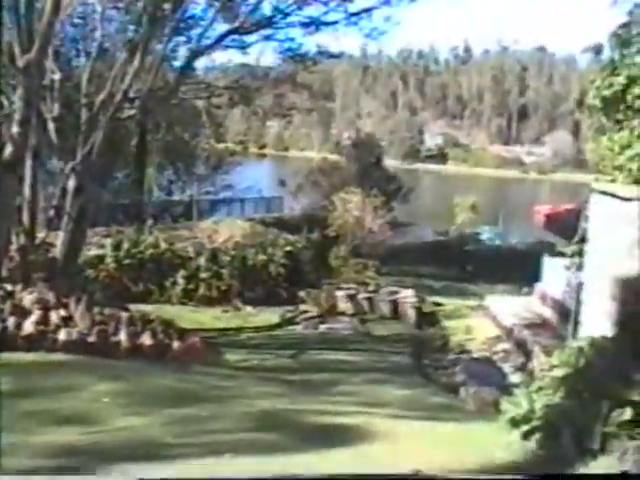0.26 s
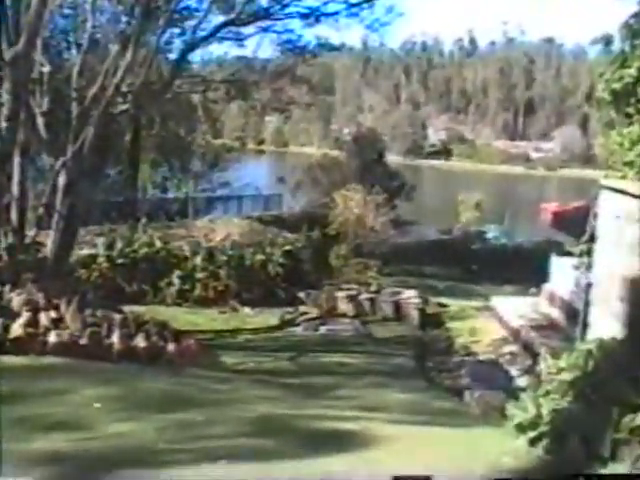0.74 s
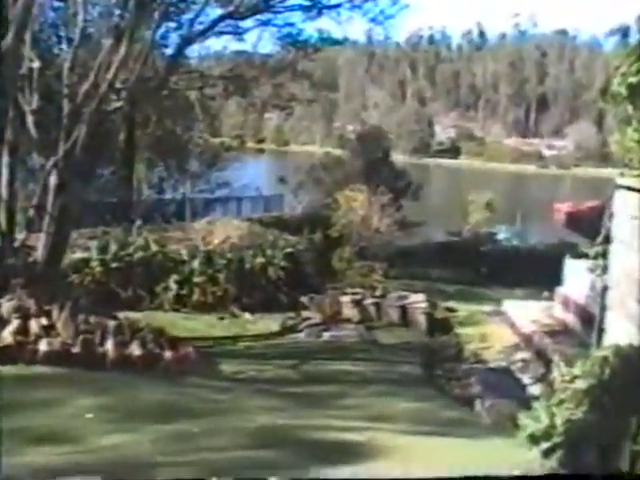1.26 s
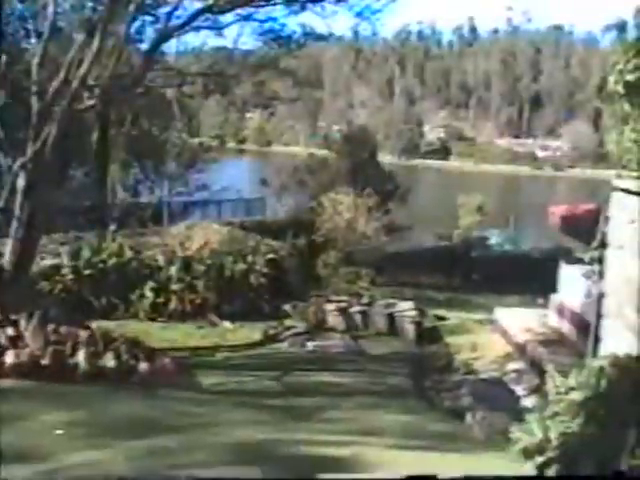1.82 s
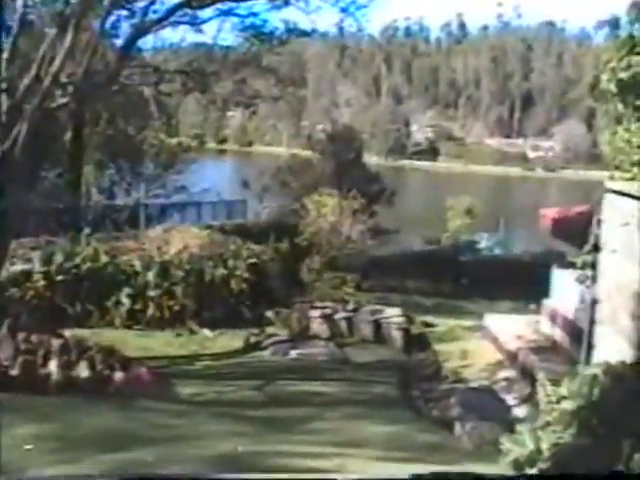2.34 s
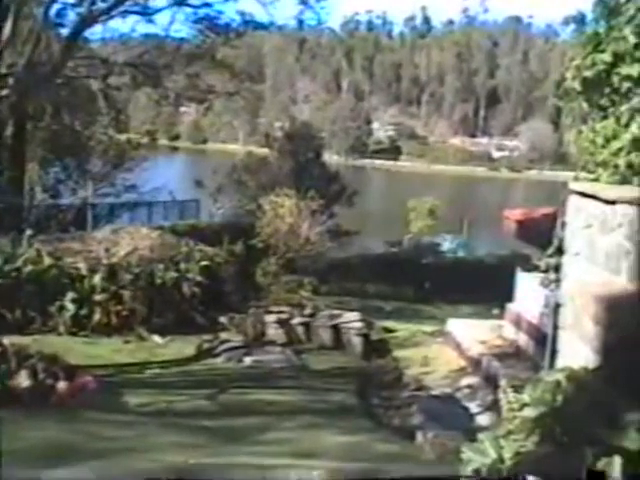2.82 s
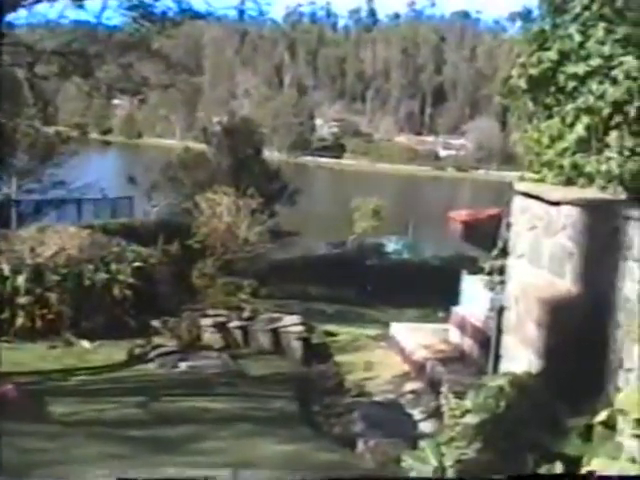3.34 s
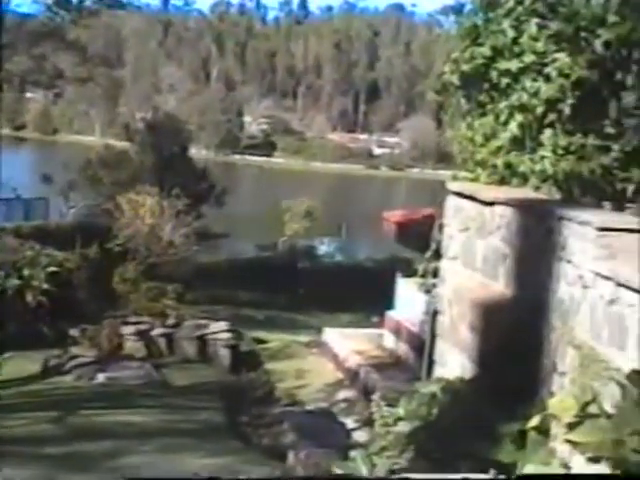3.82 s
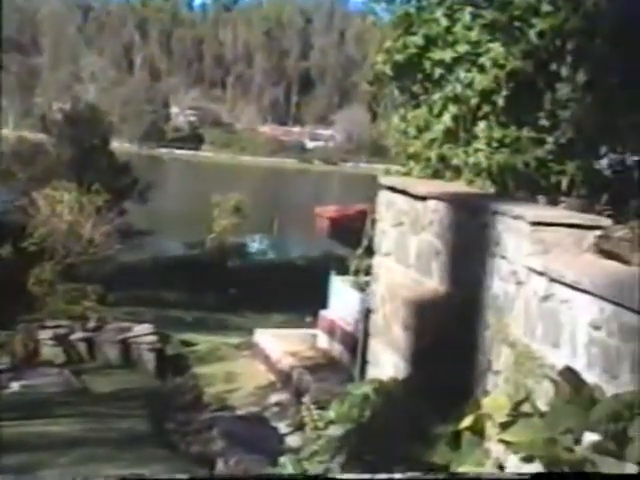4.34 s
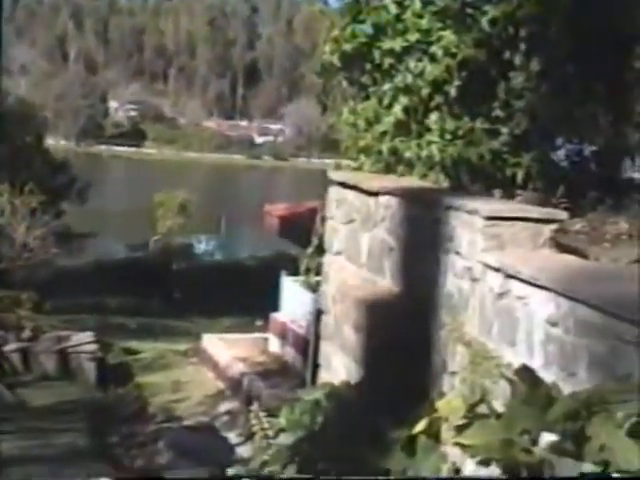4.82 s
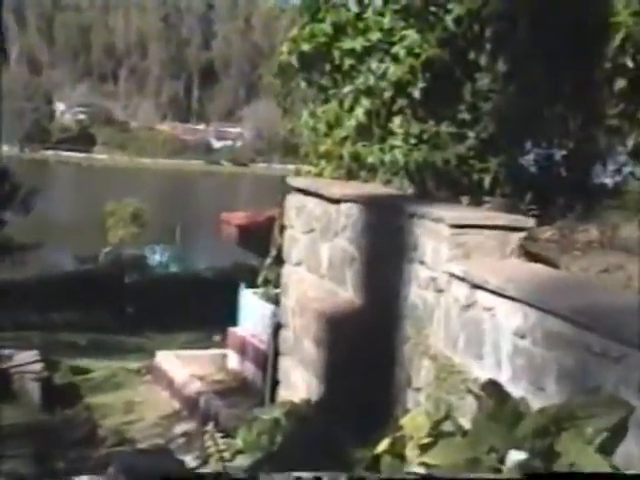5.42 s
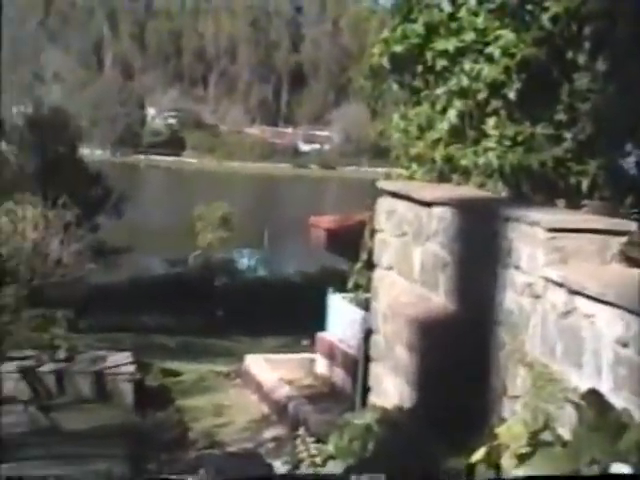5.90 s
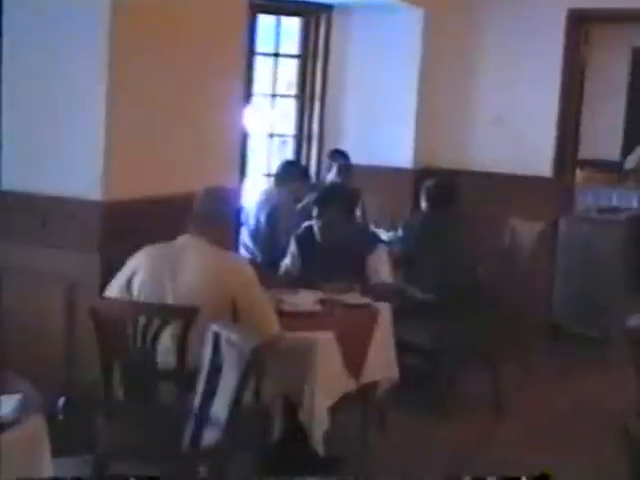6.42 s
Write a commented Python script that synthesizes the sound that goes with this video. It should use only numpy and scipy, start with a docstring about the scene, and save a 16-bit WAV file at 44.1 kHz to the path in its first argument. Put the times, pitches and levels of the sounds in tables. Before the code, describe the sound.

From 0 to 6.3 seconds, a low, throbbing motor hum from an old tape camera runs steadily, with barely audible thin whines and soft flickering hiss. Behind it lies dull, quiet garden air and a faint lumpy wind rumble. The sound begins leaning right, nears the centre around 2 seconds and leans clearly left by 4. Soft muffled knocks fall near 0.85 and 1.05, with a small rustling tick between them, a deeper bump at 2.1, and a very faint tap at 3.6. More knocks and a light rustle gather from 5.5 to 6.1. At about 6.32 a strong low thump drops in pitch; hum and garden cut out. A near-silent, murky gap with weaker thumps follows, then from 6.45 rough, muffled room noise comes in nearly centred, with brighter hiss, small knocks and a sharp tick at 6.56, sagging slightly to the end.

```python
"""A quiet garden, heard through an old tape camera, gives way to a room at a splice.
The camera's motor hums on multiples of its shaft speed, with thin steady whines, over shaped noise for
air, wind and tape hiss. Knocks are short ringing swings and rustles are puffs of noise.
The sound drifts from right to left. At the splice the tape thumps in low swings that fall in pitch,
the garden drops out, and after a near silent gap a room of roughened noise comes in."""
import sys
import numpy as np
from scipy import signal
from scipy.io import wavfile
from scipy.ndimage import uniform_filter1d

SR = 44100
rng = np.random.default_rng(int(sys.argv[2]) if len(sys.argv) > 2 else 0)


def bounce(signal):
    """Save signal as a 16-bit WAV file at the path given by the first command-line argument."""
    frames = np.transpose(np.atleast_2d(signal))
    limited = np.clip(frames, -1, 1)
    pcm = np.round(limited * 32767).astype(np.int16)
    wavfile.write(sys.argv[1], SR, pcm)


N = 293704  # length in samples

# Noise colours, each giving the relative strength of noise at a pitch: [f/Hz, level/dB per Hz]
# air of the garden
GARDEN_COLOUR = [(20, -22), (50, 1.5), (90, -0.5), (130, -2.5), (180, -1), (220, -1), (260, -3),
                 (330, -6.5), (400, -2), (480, -6), (700, -7), (1000, -14), (1400, -13), (1600, -20),
                 (1950, -21), (2250, -25.5), (2800, -34), (5000, -61)]
# rumble of the wind
WIND_COLOUR = [(10, -14), (25, 1.5), (50, 3), (70, -26), (100, -22), (200, -66)]
# air of the room after the splice
ROOM_COLOUR = [(40, 0), (120, 1), (300, 2), (500, -3.5), (800, -7), (1200, -18.5), (1700, -13), (2300, -25),
               (4000, -60)]
# dull murk of the blank tape
GAP_COLOUR = [(40, 0), (200, 2), (350, -14), (700, -21), (2000, -30), (4000, -50)]
# tape hiss
HISS_COLOUR = [(100, 5), (800, -1.5), (2000, -3), (4000, -2), (8000, -.5), (11500, 0)]
# faint noise that differs between the sides
SIDE_COLOUR = [(100, -9), (500, 1), (1200, 5), (2500, -6), (5000, -21), (11000, -11)]
# rustles and ticks
RUSTLE_COLOUR = [(100, 4), (300, 2.5), (1000, -7.5), (2200, -16), (3500, -38), (8000, -52)]

# rise and fall of the garden air: [t/s, level change/dB]
AIR_LEVEL = [(0, 0), (.7, -1), (1.3, -1.5), (2.1, -0.5), (2.9, -0.6), (3.4, 0.5), (3.7, 2), (4.1, -0.3),
             (4.9, -1), (5.3, -0.4), (5.8, 1.6), (6.3, 0)]
# balance of the two channels, the weaker one being turned down: [t/s, left minus right/dB]
DRIFT = [(0, -5), (.3, -4), (.65, -1.5), (1.45, -3), (1.72, -1.8), (1.85, -0.2), (2.5, 0.32), (3.3, 1.5),
         (4.1, 5), (6.3, 5.5)]
# brief broad rustles and ticks: [t/s, peak level/dB, time to peak/s]
RUSTLES = [(.958, -42, 0.0015), (5.803, -39.5, 0.0054), (5.93, -46, .002), (6.459, -43.5, 0.016),
           (6.482, -48, 0.012), (6.5607, -36, 0.00069), (6.59, -48, 0.0017), (6.648, -51, 0.0024)]
# soft knocks in the garden, at the splice and in the room: [t/s, level/dB, base pitch f/Hz]
KNOCKS = [(0.854, -38.5, 255), (0.959, -49, 295), (1.06, -36, 216), (2.085, -35, 58.5), (3.561, -50, 1475),
          (5.515, -42, 518), (5.757, -42.5, 1300), (5.785, -42.5, 796), (5.805, -39.5, 431),
          (6.027, -40, 450), (6.069, -30.5, 377), (6.077, -38, 425), (6.128, -41, 230), (6.308, -41, 422),
          (6.425, -45, 332), (6.459, -39, 434), (6.488, -47, 766), (6.6, -46, 703)]
# the three tones in each knock: [pitch as a multiple of the base pitch, level/dB]
KNOCK_TONES = [(1.012, -1), (0.804, -8), (1.6, -26)]
# thumps at the splice: [t/s, peak level/dB, sign of the first push, start f/Hz,
# time to fall to half the pitch/s, time to peak/s]
THUMPS = [(6.311, -40, -1, 30, .1, .006), (6.3175, -13.5, -1, 80, 0.015, .011),
          (6.336, -30, -1, 60, .05, .004), (6.372, -38, -1, 70.4, 0.12, 0.012),
          (6.399, -27, 1, 24, .3, 0.0052), (6.418, -25, -1, 33.8, 0.043, 0.019),
          (6.452, -24, -1, 30, 0.017, 0.015), (6.547, -26.5, -1, 45, 0.017, 0.0064),
          (6.5608, -22.5, 1, 303, 0.0027, 0.00079), (6.5616, -28, -1, 90, .02, 0.0017),
          (6.58, -30.5, -1, 48, 0.2, 0.0105), (6.606, -36, -1, 22, 0.12, 0.01)]
# motor hum, which multiples of the shaft speed sound: [multiple]
MOTOR_MULTIPLES = [2, 3, 4, 6, 7, 8, 10, 13, 25, 26, 28, 30, 32, 33, 34, 35, 36, 38, 45]
# motor hum, one row for each multiple: [level at the start/dB rms, wavering/dB, slow change/dB per s]
MOTOR_LEVELS = [(-55.5, 0.2, -0.28), (-47.5, -0.2, -0.06), (-45.5, 0.37, 0.02), (-59.5, 0.9, -0.01),
                (-65.5, 0.5, 0.1), (-65.5, 0, -0.5), (-69.5, 2, 0.64), (-67, 1, -0.1), (-72, 1.5, -0.6),
                (-66.5, 0.8, -0.32), (-69.5, 1.5, 0.73), (-76, 4, -2), (-76.5, 2, -1.3), (-69.5, 2, -0.06),
                (-78, 6, -2.2), (-80, 5, 0.3), (-74.5, 3.5, 0.5), (-78, 2, 0.1), (-78.5, 2, 0.4)]
# other steady whines of the camera: [f/Hz, level/dB rms]
WHINES = [(50.2, -58), (659, -66), (1262, -73), (1337, -74), (1650, -81), (1800, -74), (1977, -80),
          (3418, -87), (6200, -84), (7400, -84), (8600, -84), (9800, -84), (10200, -86), (10800, -88),
          (11000, -83)]

MOTOR_HZ = 37.67  # average shaft speed, turns per second
FIRST_THROB_S = 0.0125  # the low multiples meet in one dip of pressure each turn
LAST_LOCKED = 8  # higher multiples keep no fixed place in the turn
GARDEN_DB, WIND_DB, GUSTS_DB = -47.5, -55.5, -0.5
HISS_DB, NEW_HISS_DB = -56.5, 3  # base level, and the extra on the new stretch of tape
HISS_LEAN = 0.67  # the hiss follows the drift a little less than the scene
UNLIKE, UNLIKE_PER_DB = 0.05, 0.1  # unrelated share of the hiss, growing with the imbalance
SIDE_DB = -85  # side noise at 1 dB of imbalance
KNOCK_RISE_S, KNOCK_RISE_CYCLES = 0.0045, 0.31  # deeper knocks swell more slowly
SPLICE_S, DROP_S = 6.325, 0.0093  # the garden ends here and dies within this time
ROOM_S, ROOM_RISE_S = 6.445, 0.023  # middle of the room's fade-in, and half the fade's length
ROOM_START_DB, ROOM_DB = -55, -42  # levels at the middle and at the end of the fade-in
ROOM_SAG_DB_PER_S = -5.5  # slow change counted from the middle of the fade-in
ROOM_LEAN_DB = 0.34  # the new stretch sits barely left: left raised, right lowered by this
CLATTER_PER_S, CLATTER_DB, CLATTER_S = 230, 1.1, 0.0018  # small taps that roughen the room
GAP_DB = -55
BAND_EDGE_HZ = 11285


def amp(db):
    """Turns decibels into a plain multiplier."""
    return 10 ** (np.asarray(db) / 20)


def evened(x):
    """Scales a signal to an average strength (rms) of 1."""
    return x / np.sqrt(np.mean(x ** 2) + 1e-20)


def curve(rows):
    """Reads a table of time and value at every sample, with straight lines between rows."""
    return np.interp(np.arange(N) / SR, *np.transpose(rows))


def wander(top_hz, low_hz=0.19):
    """Slow random wavering of rms 1, made of 24 slow sines with random starts."""
    t = np.arange(0, N, 64) / SR
    slow = 0
    for f in np.geomspace(low_hz, top_hz, 24):
        slow = slow + np.sin(2 * np.pi * (f * t + rng.random())) / np.sqrt(f)
    return np.interp(np.arange(N) / SR, t, evened(slow))


def noise(colour, patchy_db, size=1024):
    """Coloured noise of rms 1 whose level varies in small patches of time and pitch."""
    hz = np.fft.rfftfreq(size, 1 / SR)
    real, imaginary, patches = rng.standard_normal((4 * N // size + 5, len(hz), 3)).T
    # blur along pitch and then along time, so that neighbours share a patch
    patches = uniform_filter1d(patches, size=8, axis=0)
    patches = evened(uniform_filter1d(patches, size=8, axis=1))
    f, db = np.transpose(colour)
    colour_db = np.interp(np.log(hz + 1), np.log(f), db)[:, None]
    spectrum = (real + 1j * imaginary) * amp(colour_db + patchy_db * patches)
    return evened(signal.istft(spectrum, nperseg=size, noverlap=3 * size // 4)[1][:N])


def add_swing(mix, start_s, peak_db, hz, glide_s, rise_s):
    """Adds a short swing that swells, dies and falls in pitch."""
    part = mix[round(start_s * SR):][:round(12 * rise_s * SR)]
    t = np.arange(len(part)) / SR
    swell = t / rise_s * np.exp(1 - t / rise_s)
    turns = hz * glide_s * np.log1p(t / glide_s)
    part += amp(peak_db) * swell * np.sin(2 * np.pi * turns)


def before_splice():
    """Gives 1 on the garden stretch of tape and 0 after the join."""
    return curve([(SPLICE_S, 1), (SPLICE_S + DROP_S, 0)])


def side_noise(lean_db):
    """Faint noise, opposite in the two channels, that grows with their imbalance."""
    strength = amp(SIDE_DB) * abs(lean_db)
    return strength * noise(SIDE_COLOUR, patchy_db=1.5) * np.array([[1], [-1]])


def hiss(lean_db):
    """Flickering tape hiss, partly shared by the channels and partly separate."""
    extra_db = NEW_HISS_DB * (1 - before_splice())
    level = amp(HISS_DB + extra_db + 0.76 * wander(40, low_hz=9.0))
    common, left, right = (noise(HISS_COLOUR, patchy_db=2.0) for _ in range(3))
    unlike = np.clip(UNLIKE + UNLIKE_PER_DB * abs(lean_db), 0, 0.9)
    # the square root keeps the total power the same for any share
    return level * (np.sqrt(1 - unlike ** 2) * common + unlike * np.array([left, right]))


def garden():
    """Dull outdoor air over a lumpy rumble of wind, both as wavering noise."""
    air_level = amp(GARDEN_DB + curve(AIR_LEVEL) + 0.44 * wander(30, low_hz=1.5))
    air = air_level * noise(GARDEN_COLOUR, patchy_db=0.5, size=2048)
    wind_level = amp(WIND_DB + GUSTS_DB * wander(4.4))
    wind = wind_level * noise(WIND_COLOUR, patchy_db=-1.0, size=4096)
    return (air + wind) * before_splice()


def gap():
    """Dull murk of the blank tape, starting at the join and staying under the room."""
    return amp(GAP_DB) * (1 - before_splice()) * noise(GAP_COLOUR, patchy_db=1.5, size=512)


def room():
    """Room noise that fades in, then sags, roughened by random taps that die away quickly."""
    since = np.arange(N) / SR - ROOM_S
    fade_db = ROOM_START_DB + (ROOM_DB - ROOM_START_DB) * np.clip(since / ROOM_RISE_S, -1, 1)
    level_db = fade_db + ROOM_SAG_DB_PER_S * np.maximum(since, 0)
    taps = rng.exponential(1, N) * (rng.random(N) < CLATTER_PER_S / SR)
    clatter = signal.lfilter([1], [1, -np.exp(-1 / (CLATTER_S * SR))], taps)
    level = amp(level_db + CLATTER_DB * (clatter - clatter.mean()))
    return level * (1 - before_splice()) * noise(ROOM_COLOUR, patchy_db=0.5, size=512)


def rustles():
    """Puffs of noise that swell and die."""
    t = np.arange(N) / SR
    swell = np.zeros(N)
    for start_s, peak_db, rise_s in RUSTLES:
        age = np.clip((t - start_s) / rise_s, 0, 50)  # counted in rise times
        swell += amp(peak_db) * age * np.exp(1 - age)
    return swell * noise(RUSTLE_COLOUR, patchy_db=1.0)


def knocks():
    """Soft knocks, each a short ring of three tones together."""
    out = np.zeros(N)
    for start_s, db, hz in KNOCKS:
        rise_s = KNOCK_RISE_S + KNOCK_RISE_CYCLES / hz
        for ratio, tone_db in KNOCK_TONES:
            add_swing(out, start_s, db + tone_db, ratio * hz, 1, rise_s)
    return out


def thumps():
    """Swings of the playback, mostly low, as the tape passes the join."""
    out = np.zeros(N)
    for start_s, peak_db, sign, hz, glide_s, rise_s in THUMPS:
        swing = np.zeros(N)
        add_swing(swing, start_s, peak_db, hz, glide_s, rise_s)
        out += np.sign(sign) * swing
    return out


def motor():
    """Hum at multiples of one slightly unsteady rotation, plus unrelated thin whines."""
    t = np.arange(N) / SR
    speed_hz = MOTOR_HZ + 0.016 * wander(6.5, low_hz=1.0)
    turns = np.cumsum(speed_hz) / SR - FIRST_THROB_S * MOTOR_HZ
    hum = np.zeros(N)
    for multiple, (db, waver_db, change) in zip(MOTOR_MULTIPLES, MOTOR_LEVELS):
        level = amp(db + waver_db * wander(9, low_hz=0.593) + change * t)
        offset = rng.random() * (multiple > LAST_LOCKED)
        hum -= level * np.cos(2 * np.pi * (multiple * turns + offset))  # minus makes the dip
    whine = np.zeros(N)
    for hz, db in WHINES:
        whine += amp(db + 1.2 * wander(7.1)) * np.sin(2 * np.pi * (hz * t + rng.random()))
    return np.sqrt(2) * (hum + whine) * before_splice()  # root 2 turns rms into peak


def scene():
    """Feeds one track to both channels, turning one side down until the splice, and adds the rest."""
    lean_db = curve(DRIFT) * before_splice()
    sides = amp(np.minimum([lean_db, -lean_db], 0))
    track = garden() + rustles() + knocks() + motor()
    room_sides = amp([[ROOM_LEAN_DB], [-ROOM_LEAN_DB]])
    join = room_sides * (gap() + room() + thumps())
    return side_noise(lean_db) + sides ** HISS_LEAN * hiss(lean_db) + sides * track + join


def record(dry):
    """Limits the band with a steep filter that removes what lies above its edge."""
    edge = signal.firwin(1501, BAND_EDGE_HZ, window=("kaiser", 10), fs=SR)
    return signal.oaconvolve(dry, edge[None], "same")


dry = scene()
out = record(dry)
bounce(out)
```